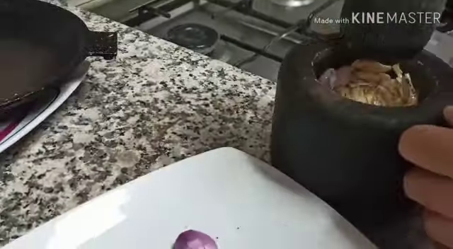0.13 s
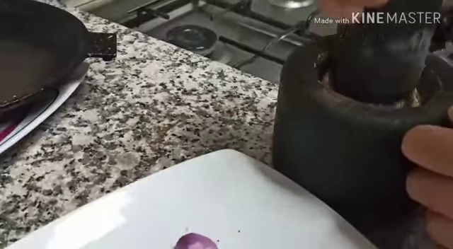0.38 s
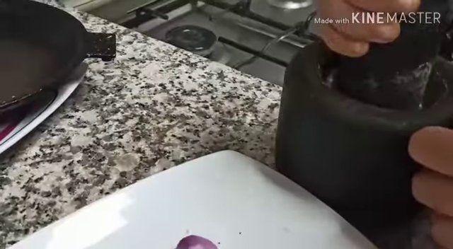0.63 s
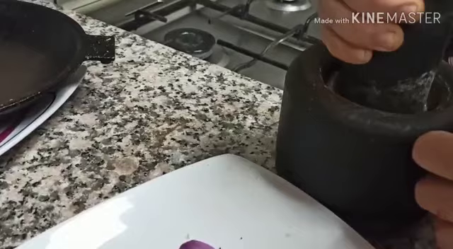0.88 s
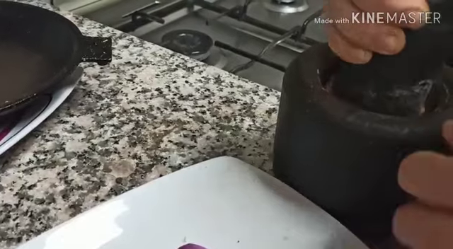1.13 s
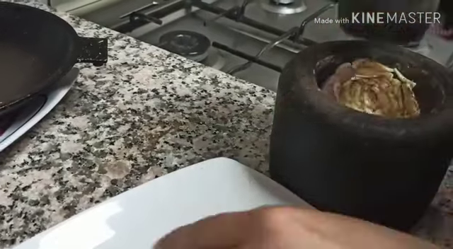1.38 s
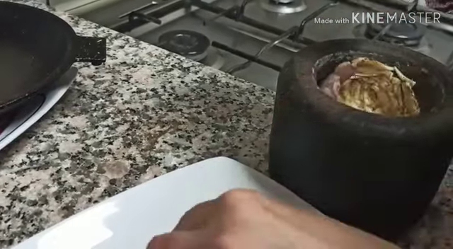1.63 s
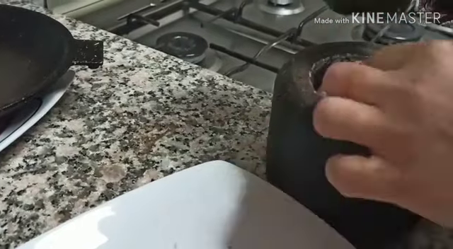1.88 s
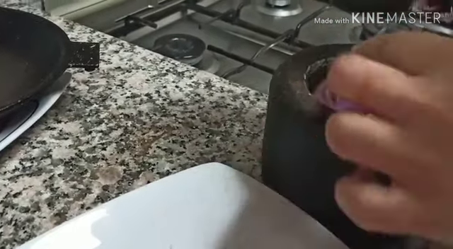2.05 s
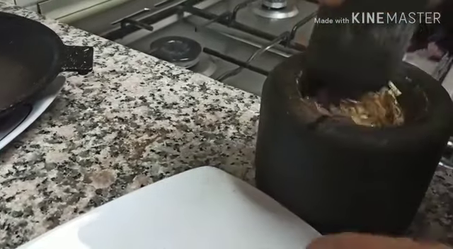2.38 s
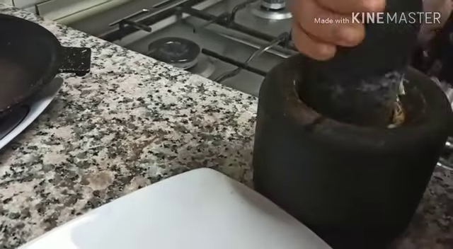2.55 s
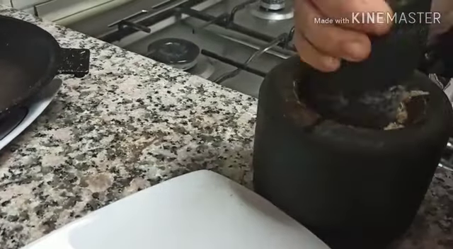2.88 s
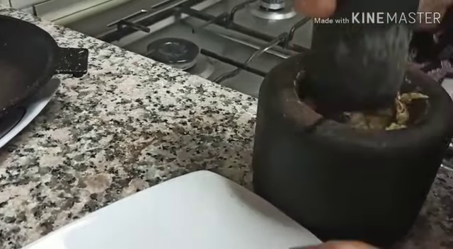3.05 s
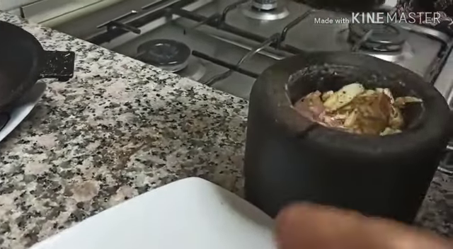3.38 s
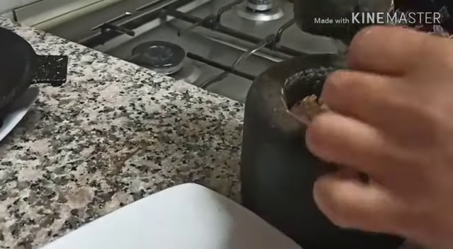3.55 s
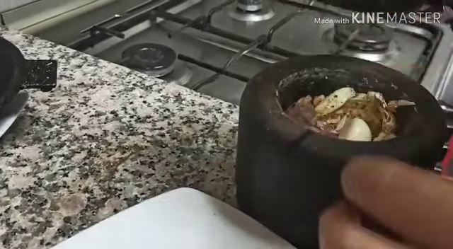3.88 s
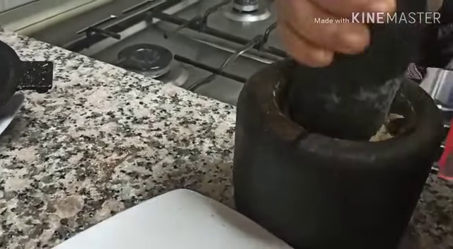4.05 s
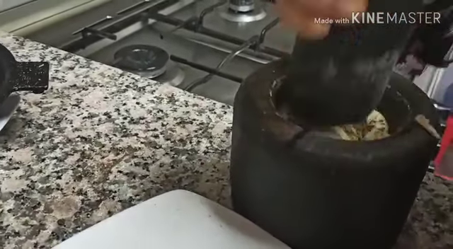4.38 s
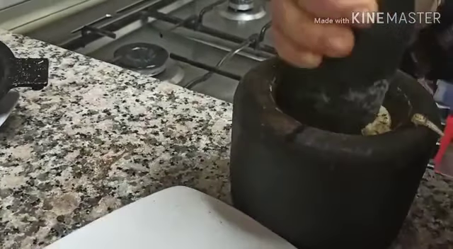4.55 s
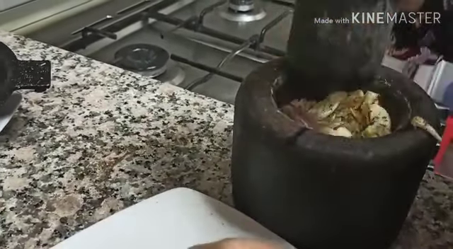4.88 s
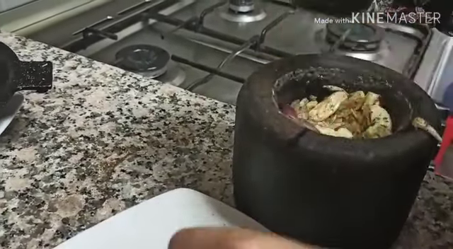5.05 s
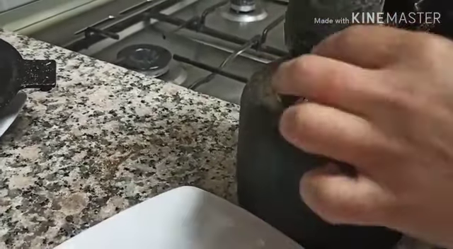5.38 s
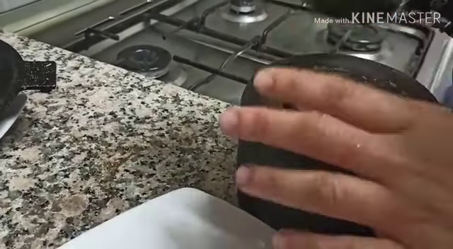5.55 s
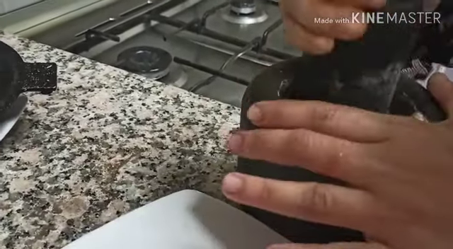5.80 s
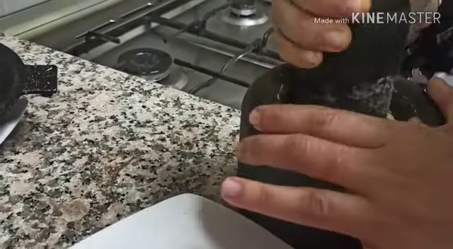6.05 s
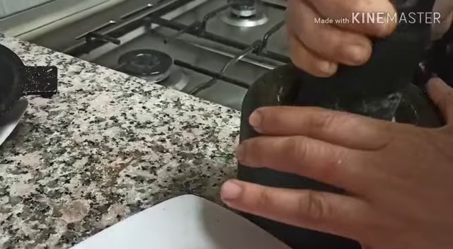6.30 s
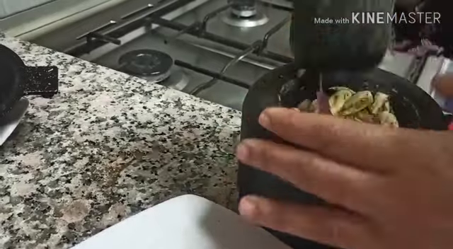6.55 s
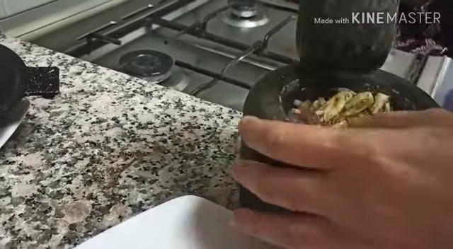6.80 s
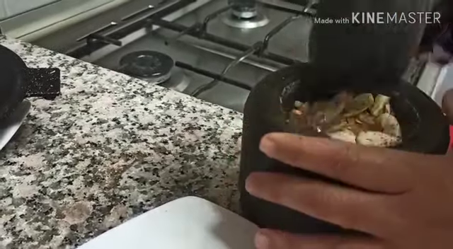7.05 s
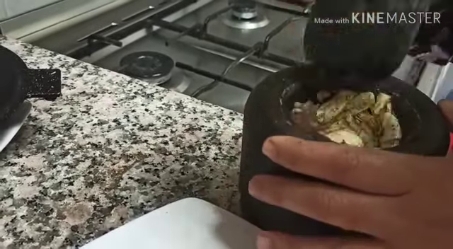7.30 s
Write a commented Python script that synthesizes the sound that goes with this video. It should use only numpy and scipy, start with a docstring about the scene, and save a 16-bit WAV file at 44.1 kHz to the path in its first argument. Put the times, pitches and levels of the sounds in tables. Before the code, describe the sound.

A stone pestle pounds shallots and garlic in a heavy stone mortar, crunchy knocks in quick groups with counter thumps, over a low kitchen rumble.

```python
"""First the dying end of a blow, then more blows in groups of three or four, with a soft tap and faint rustles between.
A stone pestle pounds shallots and garlic in a stone mortar on a kitchen counter: decaying noise is the crushed pulp,
decaying sine modes are the ringing stone and the thumping counter, and noise tails are the answer of the hard kitchen.
Shaped noise makes a low rumble, a hum and a hiss behind it all.
A phone with two microphone ports, the left one nearer to the mortar, listens and limits the loudest moments."""
import sys
import numpy as np
from scipy import signal
from scipy.fft import rfft, irfft, next_fast_len
from scipy.io import wavfile
from scipy.ndimage import uniform_filter1d

SR = 44100
rng = np.random.default_rng(int(sys.argv[2]) if len(sys.argv) > 2 else 0)


def bounce(signal):
    """Save signal as a 16-bit WAV file at the path given by the first command-line argument."""
    frames = np.transpose(np.atleast_2d(signal))
    limited = np.clip(frames, -1, 1)
    pcm = np.round(limited * 32767).astype(np.int16)
    wavfile.write(sys.argv[1], SR, pcm)


N = 328045  # length [samples]
LEAD = SR // 4  # the mix starts this many samples before time 0


def amp(db):
    """Decibels to a linear factor."""
    return 10 ** (np.asarray(db) / 20)


def unit(x):
    """Scales a sound to an RMS of 1."""
    return x / np.sqrt(np.mean(x ** 2) + 1e-20)


def along(points, hz):
    """Reads a curve of (frequency [Hz], value) points on a log frequency axis."""
    point_hz, value = np.transpose(points)
    return np.interp(np.log(hz + 1), np.log(point_hz + 1), value)


def filtered(x, response):
    """Multiplies the spectrum of x by a response of frequency."""
    size = next_fast_len(x.shape[-1] + 8192)
    spectrum = rfft(x, size) * response(np.fft.rfftfreq(size, 1 / SR))
    return irfft(spectrum, size)[..., :x.shape[-1]]


def coloured(x, curve):
    """Filters x by a curve of (frequency [Hz], level [dB]) points."""
    return filtered(x, lambda hz: amp(along(curve, hz)))


# how alike diffuse sound is at the two ports: (frequency [Hz], likeness [0 to 1])
LIKENESS = [(60, 1), (130, 0.95), (290, 0.84), (640, 0.24), (1400, 0.016)]


def diffuse(pair, spectrum):
    """Sound from all around: two unrelated noises, coloured and made alike in the bass through mid and side."""
    def response(hz):
        turn = np.arccos(np.clip(along(LIKENESS, hz), -1, 1)) / 2
        return amp(along(spectrum, hz)) * [np.cos(turn), np.sin(turn)]
    mid, side = filtered(pair, response)
    return np.array([mid + side, mid - side])


def ring(modes, t, scatter_db, favour_db=lambda hz: 0):
    """A struck body: decaying sines at new strengths each time, a little different at each port."""
    total = 0
    for hz, db, t60 in modes:
        shared = rng.normal()
        per_port = np.clip(hz / 1500, 0, 1) * rng.normal(size=(2, 1))  # ports differ more in the treble
        level_db = db + favour_db(hz) + scatter_db * (shared + per_port)
        total = total + amp(level_db - 60 * t / t60) * np.sin(2 * np.pi * hz * t)
    return total


# colour of the low rumble: (frequency [Hz], relative density [dB per Hz])
RUMBLE_COLOUR = [(12, -69), (20, -39), (38, -40), (64, -17.5), (79, -8), (107, -7.5), (166, -4.5),
                 (195, -12), (238, -10.5), (401, -17.5), (439, -20), (665, -19), (826, -20), (1500, -47),
                 (1950, -42), (3300, -120)]
# colour of the smooth hiss: (frequency [Hz], relative density [dB per Hz])
HISS_COLOUR = [(300, 0), (1000, 4), (2000, -3), (4000, -7), (8000, -8), (16000, 0.5)]
# rumble over time, before the phone: (time [s], level [dB])
RUMBLE_LEVEL = [(0, -41.5), (1.5, -44), (2.5, -43), (4, -43), (5, -42), (6, -42), (7.44, -44)]
HUM_HZ, HUM_HALF_WIDTH_HZ, HUM_DB = 166.9, 4.7, -53  # a wavering hum, perhaps of an appliance


def ambience():
    """A lumpy low rumble from outside and appliances, with a narrow band of noise as hum and a smooth hiss."""
    s, db = np.transpose(RUMBLE_LEVEL)
    z = signal.stft(rng.standard_normal((2, N)), nperseg=2048)[2]
    # lumps: a random gain, smoothed over frequency and time, shared by both ports
    field = uniform_filter1d(rng.standard_normal(z.shape[1:]), size=4, axis=0)
    field = uniform_filter1d(field, size=4, axis=1)
    lumpy = signal.istft(z * amp(3.0 * unit(field)), nperseg=2048)[1][:, :N]
    rumble = amp(np.interp(np.arange(N) / SR, s, db)) * unit(diffuse(lumpy, RUMBLE_COLOUR))
    resonance = lambda hz: 1 / (1 + ((hz - HUM_HZ) / HUM_HALF_WIDTH_HZ) ** 2)
    hum = amp(HUM_DB) * unit(filtered(rng.standard_normal(N), resonance))
    hiss = amp(-49.0) * unit(diffuse(rng.standard_normal((2, N)), HISS_COLOUR))
    return rumble + hum + hiss


# how long the kitchen answers: (frequency [Hz], t60 [s])
KITCHEN_DECAY = [(100, 0.91), (400, 0.36), (1200, 0.46), (3000, 0.5), (8000, 0.41), (15000, 0.3)]
# how strongly the walls answer: (frequency [Hz], level [dB])
WALL_COLOUR = [(100, -4), (400, 14.5), (1200, 1), (3000, 1.5), (8000, 0), (15000, 0.5)]


def walls():
    """One answer of the kitchen to a click: noise with each frequency dying at its own speed."""
    hz, t, z = signal.stft(rng.standard_normal((2, SR // 2)), SR, nperseg=256)
    decay = amp(-60 * t / along(KITCHEN_DECAY, hz)[:, None])
    tail = signal.istft(z * decay, SR, nperseg=256)[1]
    tail = tail / np.linalg.norm(tail[0])
    return diffuse(np.pad(tail, ((0, 0), (200, 0))), WALL_COLOUR)  # the answer starts 200 samples late


# shares of a left-over-right difference, one row a port: (share)
SIDES = np.array([[.5], [-.5]])
# left port over right port for a near source: (frequency [Hz], balance [dB])
PORT_BALANCE = [(200, 1.5), (400, -7.5), (1000, -5), (4000, -6), (8000, -4), (12000, -9), (16000, -13)]
# how far the left port leads the right: (frequency [Hz], lead [ms])
PORT_LEAD = [(100, 0.15), (1300, 0.31), (1900, 0.0037), (16000, 0.035)]


def heard(dry, bowl, boom, room_db):
    """Direct sound at two ports, the left one nearer, plus the answer of the walls.

    The answer is summed from two independent noise tails for a smoother decay."""
    def ports(hz):
        lead_s = along(PORT_LEAD, hz) / 1000
        return amp(SIDES * along(PORT_BALANCE, hz)) * np.exp(2j * np.pi * hz * lead_s * SIDES)
    spread = dry + 0.3 * bowl + 0.26 * boom  # the bowl beams its ring; little of it reaches the walls
    answer = 0
    for channel in spread:
        answer = answer + signal.fftconvolve(channel[None], walls(), axes=1)[:, :dry.shape[1]] / 2
    return filtered(dry + bowl + boom, ports) + amp(room_db) * answer


def add(out, sound, s):
    """Mixes a sound in at s seconds, cutting whatever runs past the end."""
    part = out[:, round(s * SR) + LEAD:][:, :sound.shape[1]]
    part += sound[:, :part.shape[1]]


# colour of crushed pulp, also of the rustles: (frequency [Hz], level [dB])
PULP_COLOUR = [(300, -40), (1000, -3.5), (2000, -5.5), (4000, -1.5), (7000, 1.5), (12000, 7), (16000, 4)]
# faint dry ticks of skins and fingers: (time [s], level [dB], t60 [ms])
RUSTLES = [(1.156, -42, 25), (1.222, -42, 36), (1.301, -44, 20), (4.754, -34, 11), (6.107, -44, 39)]


def rustle(db, t60_ms, t):
    """A dry tick of skins and fingers: a decaying burst of pulp-coloured noise, without walls."""
    skins = unit(coloured(rng.standard_normal((2, len(t))), PULP_COLOUR))
    return amp(db - 60000 * np.maximum(t, 0) / t60_ms) * (t > 0) * skins


# toneless part of a stone knock, also the scuff of the tap: (frequency [Hz], level [dB])
GRIT_COLOUR = [(150, -17), (400, -3.5), (900, 6.5), (2000, 4.5), (4000, -2.5), (8000, -10.5), (16000, -40)]
# what the tap rings: (frequency [Hz], level [dB], t60 [s])
TAP_MODES = [(180, -3.5, 0.04), (325, -27, 0.097), (530, -5, 0.085), (693, -14, 0.13), (943, -11.5, 0.14),
             (1500, 3, 0.028), (2120, -10.5, 0.046)]
# a soft tap on the counter: (time [s], level [dB], contact [ms])
TAP = (4.7238, -10.5, 1.67)


def tap(db, contact_ms, t):
    """A soft tap at t = 0: one slow push, a scuff of noise and a few decaying modes."""
    after = np.maximum(t, 0)
    u = np.clip(t * 1000 / contact_ms, 0, 1)
    push = np.sin(2 * np.pi * u) * -np.sin(np.pi * u)  # a soft contact: one slow cycle
    grit = unit(coloured(rng.standard_normal((2, len(t))), GRIT_COLOUR))
    scuff = 0.073 * amp(-60 * after / 0.083) * grit
    onset = 1 - np.exp(-(after / 0.0015) ** 2)
    wood = 0.34 * onset * ring(TAP_MODES, after, scatter_db=3.0)
    touch = amp(db + 4.2 * SIDES) * (push + onset * scuff)
    return heard(touch, amp(db + 15 * SIDES) * wood, 0 * wood, room_db=-7.5)


# modes of the counter: (frequency [Hz], level [dB], t60 [s])
COUNTER_MODES = [(82.6, -1, 0.15), (117.4, 5.5, 0.28), (177.4, -5, 0.25), (252.9, -1, 0.14),
                 (293.3, -10, 0.38), (415, -16.5, 0.12), (499, -1, 0.027), (656, -4.5, 0.072)]
# upper modes against the lowest; they grow less than the thump
UPPER_DB, UPPER_DB_PER_THUMP_DB = -5.5, -0.36


def thump(thump_db, delay_ms, t):
    """The counter booms in decaying modes and a low rattle once the pulp has passed the force on."""
    after = np.maximum(t - delay_ms / 1000, 0)
    body_db = UPPER_DB + UPPER_DB_PER_THUMP_DB * thump_db
    boom = ring(COUNTER_MODES, after, 1.5, lambda hz: body_db * (hz > 200))
    rattle_colour = [(100, -26.0), (200, 16), (450, 11), (900, -20.5)]  # (frequency [Hz], level [dB])
    rattle = unit(coloured(rng.standard_normal(len(t)), rattle_colour))
    boom = boom + amp(body_db - 10 - 60 * after / 0.43) * rattle  # the slab's many weaker modes
    return amp(thump_db) * boom * (1 - np.exp(-after / 0.002))


# modes of the stone mortar: (frequency [Hz], level [dB], t60 [s])
MORTAR_MODES = [(710, 1.5, 0.016), (914, 0.5, 0.022), (1169, -1.5, 0.049), (1435, -1, 0.018),
                (1687, -0.5, 0.029), (1900, -1.5, 0.019), (2160, -3.5, 0.049), (2837, 1, 0.028),
                (3500, -4.5, 0.062)]
KNOCK_PAN_DB, KNOCK_PAN_SCATTER_DB = 6, 1.5  # left over right; each contact beams its own way


def knock(db, pitch_hz, since):
    """Stone meets stone: toneless grit, and bowl modes favoured near the pitch of the contact."""
    near = lambda hz: np.maximum(-130 * np.log2(hz / pitch_hz) ** 2, -17)
    noise = unit(coloured(rng.standard_normal((2, len(since))), GRIT_COLOUR))
    grit = amp(-60 * since / 0.025) * noise
    stone = ring(MORTAR_MODES, since, 1.5, near)
    pan_db = rng.normal(KNOCK_PAN_DB, KNOCK_PAN_SCATTER_DB)
    contact = amp(db + pan_db * SIDES) * (1 - np.exp(-since / 0.00018))
    return 0.6 * contact * grit, contact * stone


BRIGHT_DB_PER_OCTAVE, BRIGHTER_PER_DB = 0.5, 0.36  # treble tilt of a crush at 0 dB; weaker ones are duller
CRUSH_PAN_DB = 6.5  # left over right


def crush(crush_db, rise_ms, t60_ms, t):
    """Pulp gives way: noise swells up to t = 0 and dies, as cells burst unevenly all over the bowl."""
    swell = np.exp(np.minimum(t, 0) * 1000 / rise_ms) * amp(-60000 * np.maximum(t, 0) / t60_ms)
    shared, left, right, uneven = rng.standard_normal((4, len(t)))
    bursts = amp(3 * unit(uniform_filter1d(uneven, size=30)))
    cells = (shared + 0.95 * np.array([left, right])) * bursts
    tilt_db = BRIGHT_DB_PER_OCTAVE + BRIGHTER_PER_DB * crush_db
    pulp = lambda hz: amp(along(PULP_COLOUR, hz) + tilt_db * np.log2(np.maximum(hz, 3000) / 4000))
    return amp(crush_db + CRUSH_PAN_DB * SIDES) * swell * unit(filtered(cells, pulp))


# stone on stone, once the pulp has given way and in rebounds:
# (time [s], level [dB], pitch favoured by the contact [Hz])
KNOCKS = [(-0.075, 13.5, 1280), (0.2039, -5, 1440), (0.2075, -4.5, 1030), (0.4843, -13, 2040),
          (0.4892, 1, 1074), (1.6256, -12, 1720), (1.654, -17, 920), (1.9143, 0.5, 1005), (1.921, -5, 1230),
          (1.9337, -7, 926), (2.2045, -4.5, 1050), (2.21, -6.5, 940), (3.3494, -3.5, 1760),
          (3.357, -16, 1820), (3.637, -16.5, 1720), (3.6438, -1, 1410), (3.9222, -5.5, 1650),
          (3.9278, -6, 1190), (5.081, -16, 1880), (5.0869, -16, 1860), (5.3668, 1, 1550), (5.379, 3, 1700),
          (5.6527, 2.5, 1210), (6.4881, 1.5, 1080), (6.769, 1.5, 1160), (6.777, 0.5, 1460),
          (7.0553, -7.5, 1520), (7.322, -20.5, 1900), (7.3277, -17, 1360)]


def blow(s, crush_db, rise_ms, t60_ms, thump_db, delay_ms, t):
    """One blow at t = 0: crushed pulp, the stone knocks within 50 ms of it, and the thump of the counter."""
    out = crush(crush_db, rise_ms, t60_ms, t)
    bowl = 0 * out
    for when, db, pitch_hz in KNOCKS:
        if abs(when - s) < 0.05:
            grit, stone = knock(db, pitch_hz, np.maximum(t - (when - s), 0))
            out = out + grit
            bowl = bowl + stone
    return out, bowl, thump(thump_db, delay_ms, t)


# the pestle lands in the pulp: (time [s], crush level [dB], crush rise time constant [ms], crush t60 [ms],
# thump level [dB], thump delay [ms], answer of the walls [dB])
BLOWS = [(-0.08, -3.5, 2, 160, -15.5, 2, -4), (0.202, -7, 1.8, 95, -13.5, 1, -4),
         (0.4834, -6, 2, 110, -13, 1, -5), (1.6266, -2, 3.3, 27, -18.5, 3, -6),
         (1.914, -1.5, 2.5, 61, -16.5, 3, -6), (2.1991, -0.5, 1.8, 32, -15, 1, -6.5),
         (3.3422, -10, 1.5, 81, -16.5, 7, -6.5), (3.6392, 0.5, 2.5, 29, -13.5, 1, -5.5),
         (3.923, 5.5, 1.6, 12, -17.5, 1, -4), (5.0822, -10, 2.5, 24, -24.5, 4, -7),
         (5.3659, -7, 2.5, 135, -9, 8, 1), (5.6464, -8, 1.8, 93, -11, 1, -6),
         (6.4825, -6, 2, 79, -11, 1, -9.5), (6.764, 3, 1.4, 28, -12, 1, -5),
         (7.0493, -14.5, 5, 47, -33.5, 2, -7), (7.3238, 0.5, 1.4, 33, -26.5, 2, -5)]


def pounding():
    """Every blow and the tap, each with its own answer from the walls, and the dry rustles."""
    out = np.zeros((2, N + LEAD))
    t = np.arange(-SR // 20, SR * 3 // 5) / SR
    for s, *manner, answer_db in BLOWS:
        add(out, heard(*blow(s, *manner, t), answer_db), s + t[0])
    s, db, contact_ms = TAP
    add(out, tap(db, contact_ms, t), s + t[0])
    for s, db, t60_ms in RUSTLES:
        add(out, rustle(db, t60_ms, t), s + t[0])
    return out[:, LEAD:]


def scene():
    """The pounding over the ambience of the kitchen."""
    return pounding() + ambience()


# overall colour, phone and audio coding together, with a hole near 9 to 11 kHz: (frequency [Hz], level [dB])
OVERALL_COLOUR = [(20, -3), (45, -10.5), (90, 3), (4700, -0.5), (4900, -8), (6000, -8), (6300, -1.5),
                  (8500, -5.5), (8800, -18), (11200, -46), (11600, -17), (15300, -16), (16300, -39.5)]
TOP_HZ = 16350  # nothing passes from here up
LIMIT_DB, LIMIT_SHARE = -12.5, 0.73  # where limiting starts; share of the excess it removes
LIMIT_SENSES_S, LIMIT_ATTACK_S = 0.0049, 0.0013  # span over which it senses level; smoothing time constant
RECOVER_DB_PER_S, DUCKED_AT_START_DB = 72, 4  # still recovering from the blow before time 0


def record(dry):
    """Overall colour, a limiter that ducks fast and recovers at a steady rate, soft clipping, band limit."""
    x = coloured(dry, OVERALL_COLOUR)
    span = round(LIMIT_SENSES_S * SR) | 1
    power = np.abs(uniform_filter1d((x ** 2).max(axis=0), size=span))  # of the louder port
    over_db = np.maximum(10 * np.log10(power + 1e-18) - LIMIT_DB, 0) * LIMIT_SHARE
    # a running maximum against a rising line makes the gain recover at a steady rate
    recovered_db = RECOVER_DB_PER_S * np.arange(N) / SR
    held_db = np.maximum.accumulate(np.maximum(over_db + recovered_db, DUCKED_AT_START_DB))
    duck_db = held_db - recovered_db
    keep = np.exp(-1 / (SR * LIMIT_ATTACK_S))
    smooth_db = signal.lfilter([1 - keep], [1, -keep], duck_db, zi=[duck_db[0] * keep])[0]
    x = x * amp(-smooth_db)
    x = x / (1 + np.abs(x) ** 6) ** (1 / 6)  # soft clipping
    return filtered(x, lambda hz: hz < TOP_HZ)


dry = scene()
out = record(dry)
bounce(out)
```